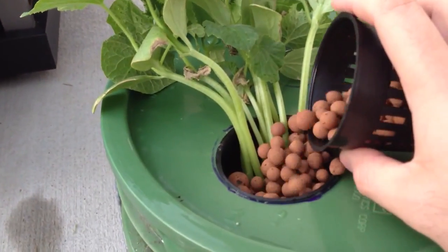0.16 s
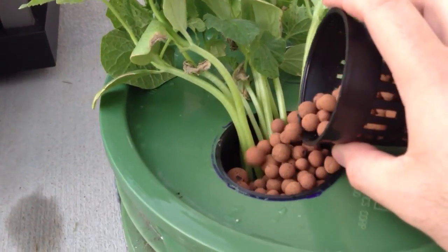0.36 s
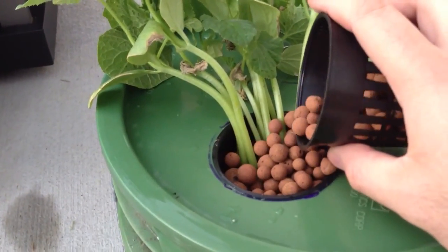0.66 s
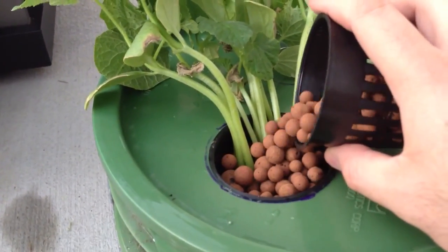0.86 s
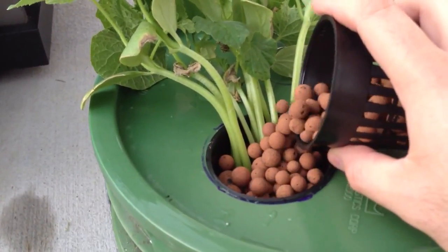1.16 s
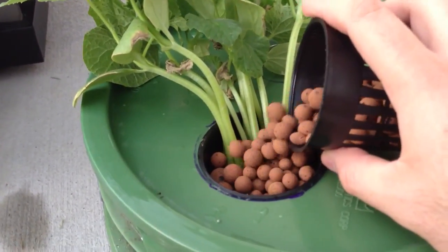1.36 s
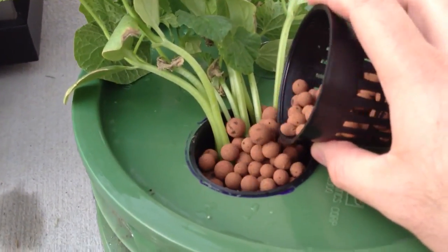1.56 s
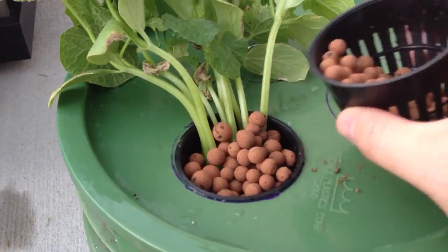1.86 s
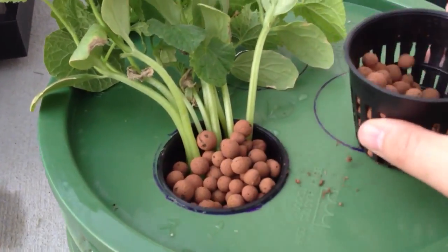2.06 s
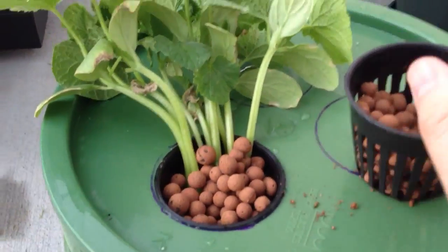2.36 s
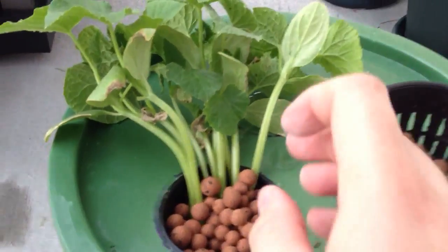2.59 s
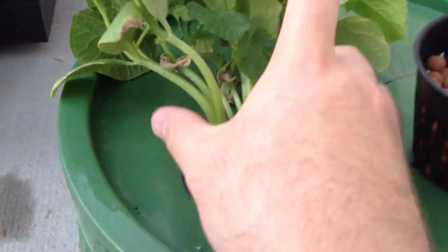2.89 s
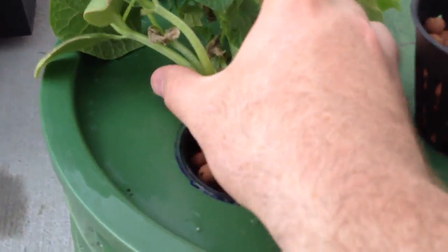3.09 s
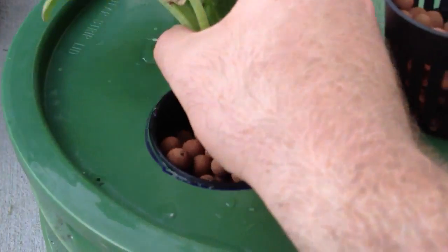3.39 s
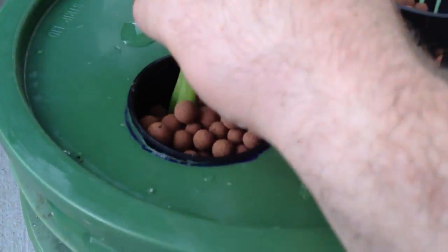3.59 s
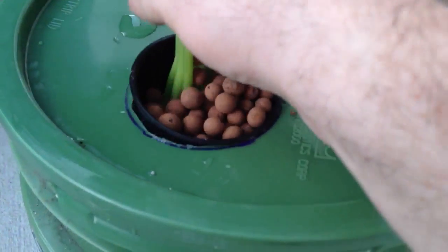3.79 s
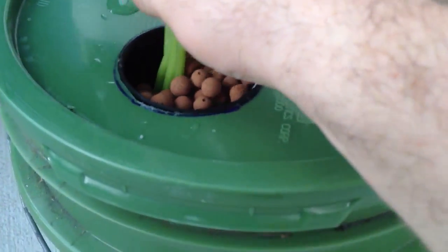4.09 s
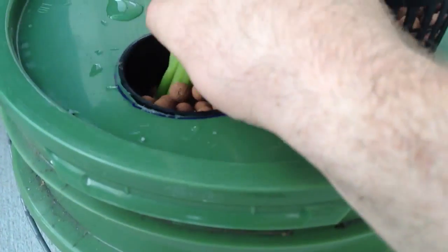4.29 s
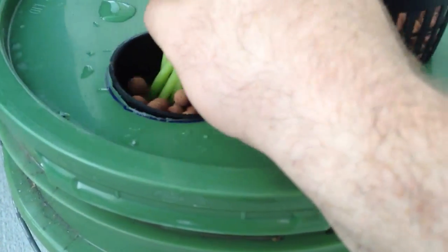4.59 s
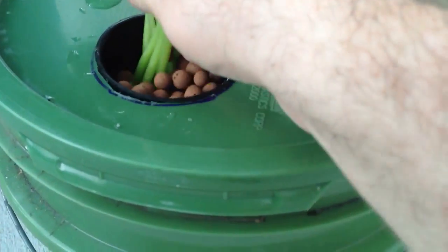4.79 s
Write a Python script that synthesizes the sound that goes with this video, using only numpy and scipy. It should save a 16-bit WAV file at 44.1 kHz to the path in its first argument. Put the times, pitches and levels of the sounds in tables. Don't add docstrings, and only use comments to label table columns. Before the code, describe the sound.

Dry, crisp clicks of small clay balls striking one another and a thin plastic pot come in irregular bursts for almost two seconds. Sparser ticks and a low lid knock follow, then a short plastic scrape and clack. Soft rubbing grows into rough crunching with hollow thumps as the pebbles are pushed down. One close microphone on a quiet terrace; low hush and faint pump hum underneath.

```python
import sys
import numpy as np
from scipy import signal
from scipy.fft import rfft, irfft, next_fast_len
from scipy.io import wavfile
from scipy.ndimage import uniform_filter1d, map_coordinates

SR = 44100
rng = np.random.default_rng(int(sys.argv[2]) if len(sys.argv) > 2 else 0)


def gain_from_db(level_db):
    decades = np.asarray(level_db, float) / 20
    return 10 ** decades


def persist_wave(psi):
    counts = np.round(np.clip(psi, -1, 1) * 32767).astype(np.int16)
    wavfile.write(sys.argv[1], SR, np.atleast_2d(counts).T)


N = 218250

# pitch in Hz, width in Hz, level in dB.
LID_LOW = [(176.5, 33, 0), (229.5, 18.4, 1)]
LID_MID = [(322.8, 51.5, 1)]
LID_HIGH = [(614, 240, -3.5), (730, 17.5, 3), (879, 21, -12.5), (1238, 135, -10.5)]
# pitch in Hz, width in Hz, level in dB.
POT_BASE = [(499, 83, 2)]


def unit(x):
    return x / np.sqrt(np.mean(x ** 2) + 1e-20)


def along(points, hz):
    f, v = np.transpose(points)
    return np.interp(np.log(hz + 1), np.log(f + 1), v)


def curves(rows):
    s, *cols = np.transpose(rows)
    return [np.interp(np.arange(N) / SR, s, c) for c in cols]


def wobble(rate):
    return map_coordinates(rng.standard_normal(int(N * rate / SR) + 4), [np.arange(N) * rate / SR])


def filtered(x, response):
    m = next_fast_len(N + SR // 2)
    return irfft(rfft(x, m) * response(np.fft.rfftfreq(m, 1 / SR)), m)[:N]


def coloured(x, spectrum):
    return unit(filtered(x, lambda hz: gain_from_db(along(spectrum, hz))))


def ringing(x, modes):
    def response(f):
        total = 0
        for k, (hz, width, db) in enumerate(modes):
            damping = 1j * f * width
            total = total + (-1) ** k * gain_from_db(db) * damping / (hz * hz - f * f + damping)
        return total
    return filtered(x, response)


def band(x, lo_hz, hi_hz):
    edges = [lo_hz, min(hi_hz, SR / 2.2)]
    return signal.sosfilt(signal.butter(2, edges, "bandpass", fs=SR, output="sos"), x)


def laid(times, rows):
    at = np.round(np.asarray(times) * SR).astype(int)[:, None] + np.arange(rows.shape[1])
    return np.bincount(at.ravel(), rows.ravel(), N + SR)[:N]


def clicks(table, tail_db, tail_t60):
    # pitch in Hz, width in Hz, level in dB.
    pot_wall = [(1120, 1060, 0), (1820, 180, 0), (2134, 203, 2.5), (3170, 75, -4)]
    s, db, hz, pot_db, edge_db = (c[:, None] for c in np.transpose(table))
    t = np.arange(SR // 12) / SR
    shape = (len(s), len(t))

    def dying(t60):
        return gain_from_db(-60 * t / t60) * (1 - np.exp(-t / .00008))

    def noise():
        return rng.standard_normal(shape)

    lumps = rng.random((len(s), len(t) // 32 + 1)) ** 2
    lumps = np.repeat(lumps, 32, axis=1)[:, :len(t)]
    tail = gain_from_db(tail_db - 0.36 * (db + 23.0) + 4.9 * lumps) * dying(tail_t60)

    since = t - .00012
    ring = np.sin(2 * np.pi * hz * since) * (dying(0.0016) + gain_from_db(-13) * dying(0.008))
    u = since / .00004
    snap = gain_from_db(db) * (gain_from_db(.35 * edge_db + 4.5) * u * np.exp(-u * u) + gain_from_db(-1) * ring)

    core = gain_from_db(db - 0.5) * noise() * (gain_from_db(-43) * dying(0.007) + tail)
    edge = gain_from_db(db + edge_db + 0.5) * noise() * (gain_from_db(-2) * dying(0.0038) + tail)
    wall = gain_from_db(db + pot_db) * noise() * (dying(0.0019) + gain_from_db(4.5) * tail)

    s = s[:, 0] + 0.00067
    pebble = band(laid(s, snap), 1800, 15300) + band(laid(s, core), 3380, 7900)
    return pebble + band(laid(s, edge), 6400, 14100) + ringing(laid(s, wall), pot_wall)


def pour():
    # start in seconds, peak in
    # dB, ring in Hz, pot-wall share in dB, edge-chip share in dB.
    first = [(0.0268, -37, 5100, 4, -1), (0.0414, -39, 6200, 4.5, 10), (0.0742, -26.5, 5270, -2, 5.5),
             (0.0903, -31, 6900, -4, -6), (0.0986, -24, 7800, -8, 1.5), (0.1185, -32, 7430, -9, 3),
             (0.1329, -29.5, 7600, -12, -1), (0.1969, -23, 6600, -19, -13), (0.1993, -26, 6500, -15, -11),
             (0.2148, -18.5, 8150, -4.5, -2), (0.247, -36, 7350, -15, 5), (0.2809, -24, 6470, -7.5, 3),
             (0.3098, -22, 6740, -16, -21), (0.3199, -21, 6400, -8, -26), (0.3431, -35.5, 5060, -1, 1),
             (0.3614, -26.5, 7400, -14, -0.5), (0.3798, -36, 7360, -23, -2),
             (0.4263, -14.5, 7700, -14, -3.5), (0.4406, -28, 6540, -7, 3.5), (0.4813, -38, 8000, -11, -1),
             (0.5138, -31, 8240, -12, -6), (0.5202, -44.5, 7390, -9, -4), (0.5738, -31.5, 7640, -5.5, -8),
             (0.6059, -29, 7200, -23, -9.5), (0.6418, -28, 6800, -3, -18)]
    second = [(0.818, -30.5, 6160, -19, -13), (0.8258, -33, 6700, -26, -1), (0.8452, -30.5, 5170, 0, 4),
              (0.8546, -31, 6400, -17, 6.5), (0.856, -35, 6500, -17, -13), (0.869, -21, 6850, -15, -13),
              (0.908, -35.5, 8400, -6, -2), (0.9252, -27, 7600, -23, -8), (0.9357, -39, 8470, -15, 3),
              (0.9441, -31, 6770, -10, -12), (0.9541, -35, 7540, -6, 3), (0.961, -21.5, 6700, -10, -7),
              (0.9931, -27.5, 6400, -16, -2), (0.9965, -26, 6450, -13, -16), (1.0003, -38, 6250, -19, -8),
              (1.024, -41, 6370, -18, -2), (1.05, -45, 7470, -16, 3), (1.055, -33.5, 6600, -27, 1.5),
              (1.064, -33, 7500, -20, 0), (1.076, -34, 7420, -4.5, -1), (1.0938, -39, 8420, -17, 9.5),
              (1.113, -33, 6420, -25, -11), (1.123, -19, 7950, -4.5, -5.5), (1.1516, -25.5, 6560, -14, -7),
              (1.171, -28.5, 7960, -11, -6), (1.2065, -40, 7800, -19, -2)]
    third = [(1.224, -31.5, 7960, -22, -3.5), (1.2587, -23.5, 4140, 0.5, -29), (1.3368, -38, 6820, -7, 0),
             (1.349, -35, 8150, -12, 3), (1.376, -28.5, 6940, -10, -8), (1.412, -36, 6800, -10, -19),
             (1.4298, -31, 6400, -4, 2), (1.4563, -30, 7000, -5, 0), (1.4614, -17.5, 6760, -17, -16),
             (1.496, -27.5, 7400, -13, 1), (1.5577, -32, 6700, -10, 4.5), (1.561, -23.5, 7160, -9, -11),
             (1.591, -28, 7900, -10, -14), (1.6002, -30.5, 4850, -1, -1), (1.622, -32, 8200, -9, -12),
             (1.642, -31.5, 7120, -16, -2), (1.6755, -26.5, 8100, -10, 1), (1.7, -28, 6900, -30, -5),
             (1.7365, -36, 8350, -10, -5), (1.7581, -26.5, 6000, -10, -2), (1.7613, -26, 2740, -1, -10),
             (1.7842, -32, 3550, -7, -13)]
    light = [(0.0641, -31, 6700, -7, -8), (0.082, -27, 6650, -6, -12), (0.1536, -44, 6680, -16, 6),
             (0.1895, -39, 8980, -28, 1), (0.2541, -44, 7280, -24, -9), (0.2634, -45, 5880, -22, 3),
             (0.2914, -33, 7640, -23, -6), (0.408, -40, 7190, -22, -17), (0.462, -42, 8350, -20, -9),
             (0.475, -44, 4540, -5, -20), (0.5483, -52, 6220, -15, 1), (0.6817, -43, 7240, -1, -6),
             (0.7467, -54, 6220, -18, -11), (0.758, -42, 7000, -5, -8), (0.7899, -44, 7520, -13, -13),
             (0.834, -34, 6590, -26, -14), (0.89, -40, 6500, -10, -17), (1.1026, -38, 8250, -18, -1),
             (1.292, -41, 6740, -3, -20), (1.3207, -38, 7540, -8, -3), (1.387, -33, 6780, -13, -15),
             (1.398, -40, 7190, -19, 1), (1.41, -17.5, 6500, -11, -38), (1.439, -27, 6830, -19, -13),
             (1.443, -23.5, 8100, -18, -10), (1.4487, -31, 7820, -13, -11), (1.483, -39, 5330, -6, -14),
             (1.5112, -34, 6630, -4, -17), (1.533, -36, 7900, -7, -20), (1.572, -40, 7240, -14, -11),
             (1.597, -27.5, 7990, -17, -2), (1.6526, -38, 8100, -26, 0), (1.6634, -45, 7050, -20, -3),
             (1.671, -39, 6030, 5.5, 2), (1.6793, -28, 7920, -16, -11), (1.7122, -51, 8980, -14, 2),
             (1.7615, -35, 5260, -6, -17)]
    return clicks(first + second + third + light, tail_db=-13.5, tail_t60=0.045)


def handling():
    # start in seconds, peak in dB, ring in Hz, pot-wall share in dB, edge-chip share in dB.
    set_down = [(1.904, -44.5, 8100, -29, 1), (1.9428, -39.5, 7140, -21, 0.5), (1.9854, -37, 7220, -20, 3),
                (2.0028, -35, 6740, -24, 2.5), (2.0134, -29, 8300, 5, -17), (2.0393, -36, 6840, -19, 1),
                (2.061, -26.5, 8050, -28, -2), (2.0691, -33.5, 7170, -27, 4), (2.084, -48, 6740, -27, 10),
                (2.1041, -39, 7890, -23, 3), (2.1331, -36.5, 6820, -17, 4.5),
                (2.177, -29.5, 7500, -27, 2.5), (2.182, -25, 8350, -33, -0.5), (2.237, -27, 8440, -13, 6.5),
                (2.2957, -49, 8580, -19, 2), (2.3121, -32.5, 7980, -21, -5), (2.339, -35, 7300, -22, -4),
                (2.3855, -33, 7350, -32, -4)]
    touched = [(2.542, -31.5, 6860, 6, -17), (2.5594, -36, 6540, 4, -16), (2.6517, -20, 7100, -16, -23),
               (2.6559, -22, 4600, -3, -20), (2.674, -21, 4870, -1, -31), (2.9853, -46.5, 6100, 1, -1),
               (3.1066, -42, 4700, -6, -11), (3.3595, -34, 5500, 9.5, -12), (3.4047, -36.5, 7030, 8, -16),
               (3.4179, -32, 8350, -13, -4.5), (3.592, -35, 7160, -19, 3), (3.6402, -35, 5200, -6, 0),
               (3.6444, -32, 5160, -13, 3)]
    pressed = [(3.812, -44, 8500, -17, 12), (3.826, -38, 7300, -19, 6), (3.8896, -34, 7700, -12, 4),
               (3.914, -32.5, 6300, -10, 2), (3.9934, -38, 6600, -3, -11), (4.008, -28, 7900, -3, -15),
               (4.0663, -28.5, 7040, -8, -3.5), (4.131, -30, 7700, -21, -3.5),
               (4.2446, -31.5, 6300, 6.5, -9), (4.3226, -47, 7000, -14, -10), (4.373, -31.5, 7400, 0, 1),
               (4.5517, -33, 6910, -6, -5), (4.5552, -30, 7000, 0, -3), (4.5595, -26, 7500, -9, -10),
               (4.562, -23, 8100, -19, -8), (4.608, -28.5, 7700, -24, -3), (4.6284, -31, 7200, -1, 4),
               (4.645, -35, 7460, -23, 6), (4.6568, -38, 8110, -19, 10), (4.681, -40, 7000, -14, -6),
               (4.6916, -25.5, 8800, -3, -4), (4.7079, -32, 7200, -14, -1), (4.7169, -40, 7200, -17, -10),
               (4.7818, -33.5, 8100, 4, 2), (4.8, -26.5, 7050, -20, 3.5), (4.848, -37, 6530, -25, -4),
               (4.8654, -27.5, 6700, -13, -6), (4.8841, -37, 7800, -18, 3), (4.894, -33, 6700, -29, -17)]
    light = [(1.9182, -39, 6800, -21, -17), (1.9575, -36, 6930, -24, -10), (1.968, -42, 7080, -23, 3),
             (1.9919, -41, 7390, -24, -15), (2.1484, -41, 6930, -2, -15), (2.17, -37, 5300, -31, -7),
             (2.221, -48, 4180, -18, -15), (2.2464, -47, 8980, -15, -3), (2.2812, -48, 8400, -15, 0),
             (2.32, -44, 7580, -19, -29), (2.6221, -49, 6980, -20, -13), (2.991, -45, 5770, -12, -7),
             (3.2202, -43, 7410, -3, -20), (3.3894, -35, 6400, 2.5, -15), (3.4572, -56, 6780, -26, -11),
             (3.545, -49, 8800, -4, 11), (3.6051, -35, 8200, -23, -10), (3.6818, -37, 8740, -18, -18),
             (3.8376, -40, 4570, -21, 7), (3.953, -37, 7390, -20, -19), (3.984, -30, 8200, -19, -22),
             (4.0282, -47, 5450, -9, -8), (4.1144, -36, 5140, -17.5, -16), (4.1604, -30, 5400, -20, -14),
             (4.1766, -49, 4750, -12, -9), (4.2872, -35, 7350, -9, -20), (4.4328, -40, 4440, -12, 0),
             (4.4524, -49.5, 4010, -13, 3), (4.5391, -36, 7210, -14, -6), (4.615, -35, 5000, -7, 2),
             (4.7211, -36, 8980, -12, 4), (4.728, -39, 7040, -32, -10), (4.754, -36, 6140, -8, -11),
             (4.8098, -39, 6520, -18, 6)]
    return clicks(set_down + touched + pressed + light, tail_db=-20.5, tail_t60=0.066)


def more_contacts():
    # start in seconds, peak in dB.
    taps = [(.0015, -39), (.0054, -31), (.0316, -38), (.1377, -26), (0.2353, -34), (0.357, -37),
            (.8615, -36), (0.9637, -30), (1.0003, -32), (1.0704, -33), (1.1279, -33.5), (1.2715, -42),
            (1.6143, -34), (2.0723, -33), (2.5708, -29), (4.2974, -34), (4.3074, -43), (4.5238, -35)]
    pick = rng.random((len(taps), 2))
    rows = [(s, db, 6200 + 2000 * a, -12 - 8 * b, -6) for (s, db), (a, b) in zip(taps, pick)]
    return clicks(rows, tail_db=-16, tail_t60=0.034)


def thuds():
    # start in seconds, level of the two deep modes in dB, then relative to it the
    # middle mode in dB, pot base in dB, upper modes in dB.
    knocks = [(0.085, -56.5, 12, 11, 6.5), (0.146, -40.5, -15, -10, -11), (1.258, -44.5, -9, -31, 1),
              (2.012, -26.5, 0.5, -1, -19), (2.018, -26.5, -12, -37, -41), (2.071, -42, 4, 2, -30),
              (2.148, -46.5, 5, 5, -10), (2.246, -47, 2, 3, -19), (2.39, -46, 4.5, -19, -30),
              (2.6495, -34, -29, 6.5, -16), (3.359, -41, -12, -13, 1), (4.011, -33.5, 1, -10, -8.5),
              (4.2365, -26.5, 2.5, -5.5, -7.5), (4.338, -47, 8, -15, 0), (4.37, -33, 4, -6, -8),
              (4.521, -28, 3, -7.5, -6), (4.5537, -35, 7.5, -3, -4), (4.6205, -31, 1, -6, -12),
              (4.685, -37.5, 4.5, -10, -15), (4.717, -53.5, 10, -8, 7)]
    s, db, mid_db, base_db, upper_db = (c[:, None] for c in np.transpose(knocks))
    t = np.arange(SR // 6) / SR
    by_pot = s < 3.7
    onset = 1 - np.exp(-t / np.where(by_pot, 0.0016, 0.0011))
    stretch = np.where(by_pot, 0.55, 0.73)

    def ring(modes):
        total = 0
        for hz, width, level_db in modes:
            decay = np.exp(-np.pi * width * t / stretch)
            total = total + gain_from_db(level_db) * np.sin(2 * np.pi * hz * t) * decay
        return total

    lid = ring(LID_LOW) + gain_from_db(mid_db + 4.0) * ring(LID_MID) + gain_from_db(upper_db) * ring(LID_HIGH)
    knock = gain_from_db(db + 2.0) * onset * (lid + gain_from_db(base_db + 6.5) * ring(POT_BASE))
    return band(band(laid(s[:, 0] + 0.00029, knock), 150, 2000), 147, 4700)


def grains(per_second, spread_db, t60):
    count = int(per_second * N / SR)
    sizes = gain_from_db(spread_db * np.minimum(rng.exponential(size=count), 3))
    puff = gain_from_db(-60 * np.arange(SR // 20) / SR / t60)
    hits = np.bincount(rng.integers(0, N, count), sizes, N)
    return signal.fftconvolve(hits, puff)[:N] * rng.standard_normal(N)


def slips():
    # peak time in seconds, half length in seconds, grit in dB, weight on the lid in dB.
    rolls = [(.01, 0.044, -39.5, -19), (0.124, 0.071, -48, -6), (0.306, 0.17, -57, -7.5),
             (0.68, 0.12, -58.5, -13), (0.903, 0.24, -55.5, -14), (1.14, 0.15, -59, -4),
             (1.26, 0.029, -46.5, -14), (1.42, 0.077, -49.5, -9), (1.594, 0.21, -66.5, 7),
             (1.775, 0.029, -51.5, -7), (2.012, 0.2, -55, -26), (2.075, 0.14, -66, 9.5),
             (2.338, 0.27, -68.5, 3), (2.551, 0.019, -64.5, 10)]
    pushes = [(2.92, 0.63, -64.5, -0.5), (3.19, 0.034, -55.5, -7), (3.23, 0.1, -52.5, -8.5),
              (3.32, 0.45, -58, -19), (3.56, 0.28, -56.5, 0), (3.769, 0.12, -52, -3),
              (3.871, 0.059, -45, -3.5), (4.007, 0.13, -48.5, -2), (4.146, 0.042, -46.5, -18),
              (4.28, 0.15, -45.5, -4.5), (4.4, 0.2, -54.5, -6), (4.546, 0.095, -43, -3.5),
              (4.705, 0.087, -42.5, -11), (4.81, 0.19, -60.5, 4), (4.96, 0.058, -45.5, -3.5)]
    s, half, db, weight_db = (c[:, None] for c in np.transpose(rolls + pushes))
    coarse = np.arange(0, N, 64)
    u = (coarse / SR - s) / half
    shape_db = -8.5 * np.abs(np.where(u < 0, u / 0.46, u)) ** 1.15
    body_db = np.where(s < pushes[0][0], -60.5, -55.5) + 0.68 * (db + 54.5)

    def summed(level_db):
        power = np.sum(gain_from_db(level_db + shape_db) ** 2, axis=0)
        return np.interp(np.arange(N), coarse, 10 * np.log10(power + 1e-12))

    return summed(db), summed(body_db), summed(db + weight_db)


def patchy(x, depth_db, wide, long):
    z = signal.stft(x, nperseg=256)[2]
    field = rng.standard_normal(z.shape)
    for _ in range(2):
        field = uniform_filter1d(uniform_filter1d(field, int(wide), 0), int(long), 1)
    return signal.istft(z * gain_from_db(depth_db * unit(field)), nperseg=256)[1][:N]


def grind():
    # pitch in Hz, level in dB per Hz.
    grit_colour = [(1760, -56), (3000, -13), (3750, 0), (4130, -1), (7760, 3), (9780, -7), (13100, -5.5),
                   (15200, -10.5)]
    body_colour = [(470, 3), (800, 4.5), (1000, -2.5), (1810, -2.5), (2600, -0.5), (2770, -5.5),
                   (4500, -15.5), (5850, -12), (9900, -120)]
    grit_db, body_db, lid_db = slips()
    rub = unit(grains(1100, spread_db=0.5, t60=0.077))
    ticks = unit(grains(300, spread_db=3, t60=.003))
    grit = gain_from_db(grit_db) * coloured(patchy(rub + .45 * ticks, depth_db=2, wide=9, long=7), grit_colour)
    dull = coloured(patchy(rub, depth_db=1.5, wide=3, long=8.2), body_colour)
    body = gain_from_db(body_db) * band(dull, 333, 6300)

    shake = grains(600, spread_db=3.5, t60=0.019)
    low = ringing(shake, LID_LOW + LID_MID)
    high = band(ringing(shake, POT_BASE + LID_HIGH), 608, 1390)
    rumble = unit(band(low + gain_from_db(-4.0) * high, 164, 1580))
    return grit + body + gain_from_db(lid_db + 4.5) * rumble


def slide():
    # time in seconds, level in dB.
    swell = [
        (2.5, -63.5),
        (2.535, -50),
        (2.562, -38.5),
        (2.58, -45.5),
        (2.6, -62),
        (2.648, -66),
        (2.651, -32),
        (2.7, -48.5),
        (2.75, -68.5),
    ]
    # pitch in Hz, level in dB per Hz.
    skid = [(530, -28), (900, -16.5), (1880, 6.5), (2100, -2), (2450, 3.5), (5060, 3), (13800, -9),
            (15500, -14)]
    return gain_from_db(curves(swell)[0]) * coloured(grains(1800, spread_db=1.2, t60=0.02), skid)


def background():
    # pitch in Hz, level in dB per Hz.
    hush_colour = [(15, -79), (25, -30), (95, -16.5), (128, -7), (192, 4), (258, 0), (337, -5.5),
                   (576, -18.5), (677, -20.5), (1290, -19.5), (1640, -23.5), (8650, -79), (9630, -19),
                   (10700, -42), (15200, -33)]
    # pitch in Hz, level in dB rms.
    pump = [(120, -73), (181, -73), (240, -66)]
    t = np.arange(N) / SR
    hush = gain_from_db(-56.5 + 0.56 * wobble(1.87)) * coloured(rng.standard_normal(N), hush_colour)
    hum = 0
    for hz, db in pump:
        level = gain_from_db(db + 3.5 + 2.8 * wobble(4.11))
        hum = hum + level * np.sin(2 * np.pi * hz * t + .9 * wobble(11))
    insect = gain_from_db(-78 + 3.2 * wobble(5.1)) * unit(band(rng.standard_normal(N), 9530, 10100))
    return hush + hum + insect


def scene():
    pebbles = pour() + handling() + more_contacts()
    return (pebbles + thuds() + grind() + slide() + background())[None]


def low_pass(x):
    return signal.sosfilt(signal.butter(12, 16470, fs=SR, output="sos"), x)


def record(dry):
    # pitch in Hz, gain in dB.
    treble_loss = [(15150, 0), (15400, -22), (15900, -30), (16000, -60)]
    dulled = filtered(dry[0], lambda hz: gain_from_db(along(treble_loss, hz)))
    return low_pass(dulled[None])


dry = scene()
out = record(dry)
persist_wave(out)
```